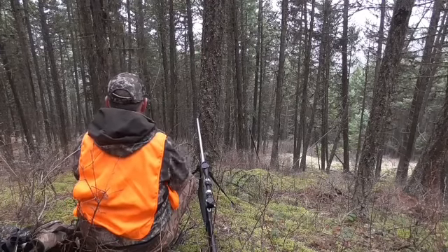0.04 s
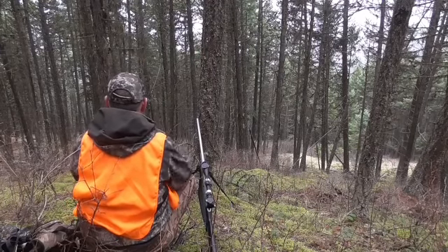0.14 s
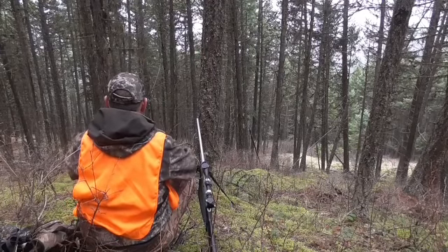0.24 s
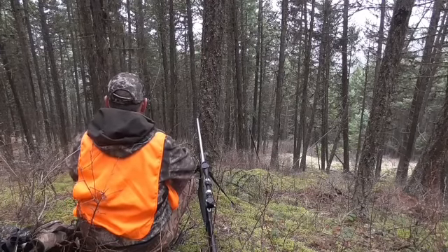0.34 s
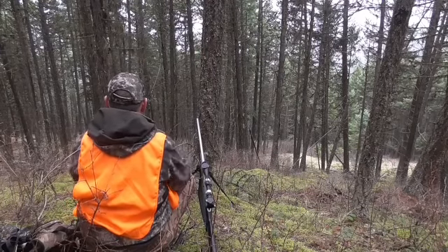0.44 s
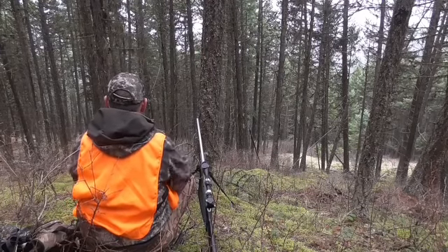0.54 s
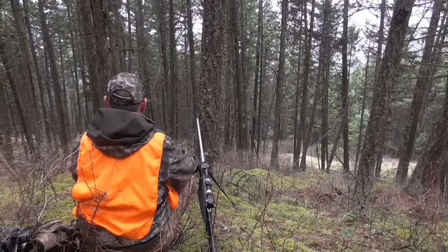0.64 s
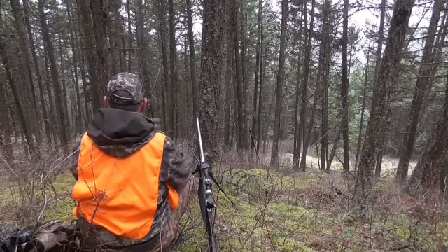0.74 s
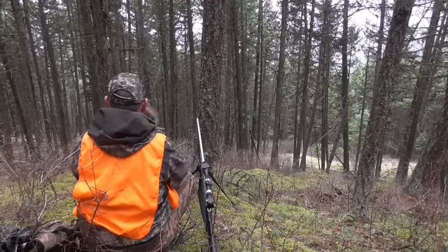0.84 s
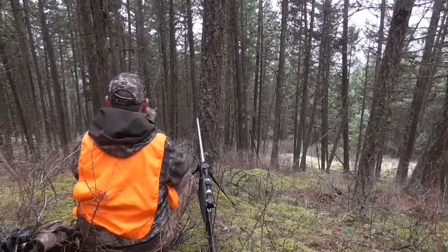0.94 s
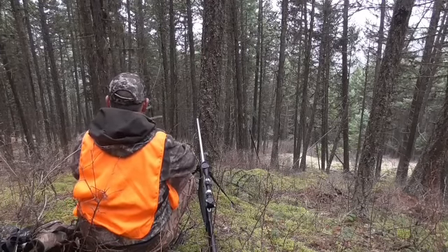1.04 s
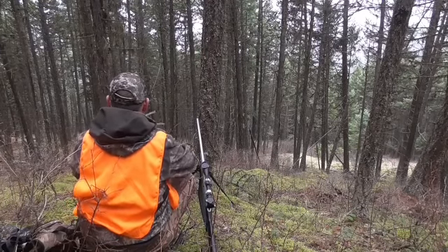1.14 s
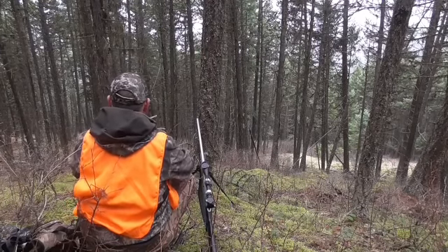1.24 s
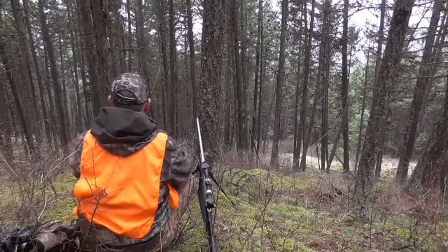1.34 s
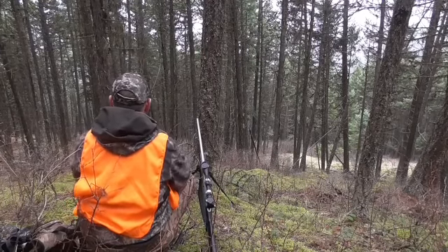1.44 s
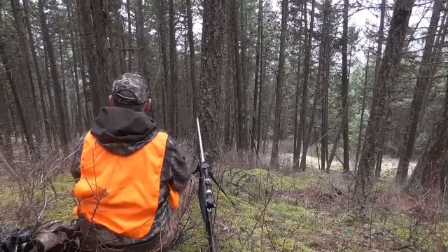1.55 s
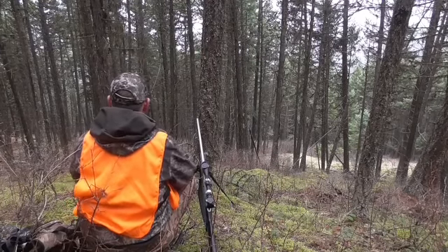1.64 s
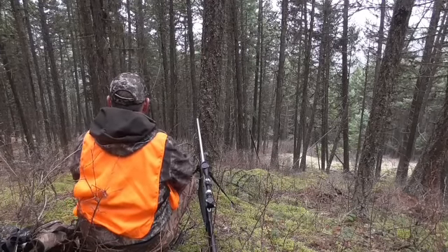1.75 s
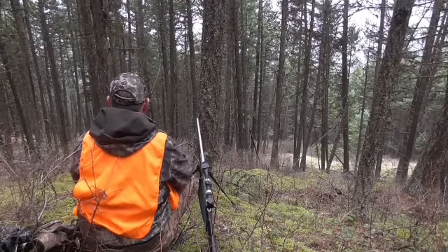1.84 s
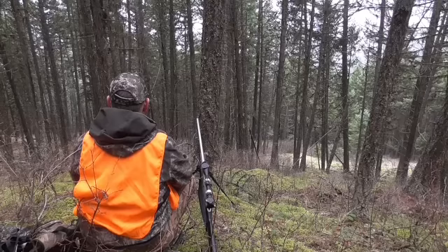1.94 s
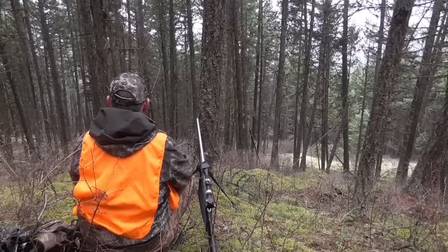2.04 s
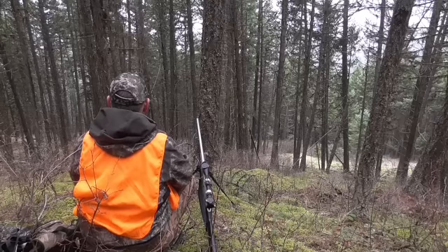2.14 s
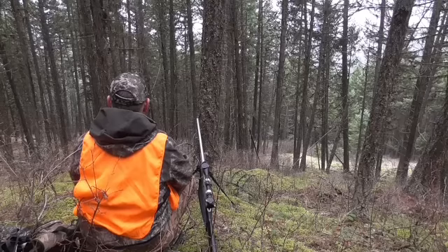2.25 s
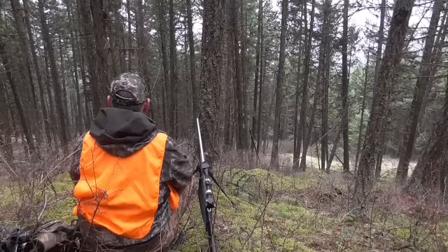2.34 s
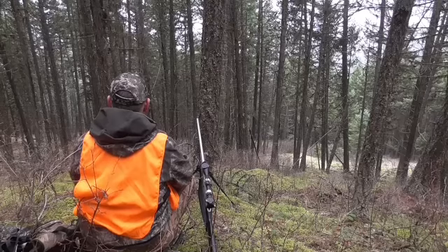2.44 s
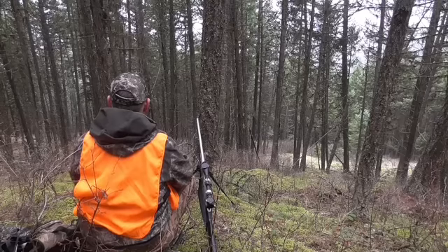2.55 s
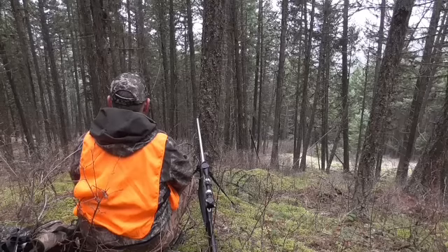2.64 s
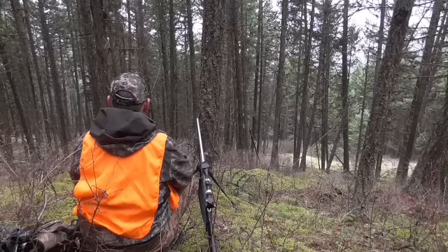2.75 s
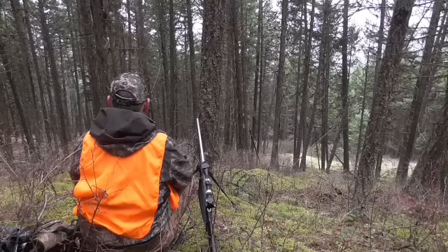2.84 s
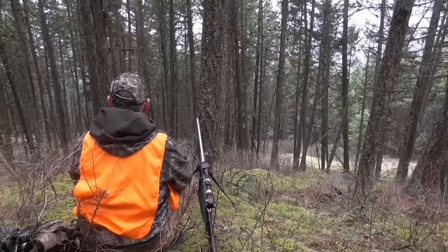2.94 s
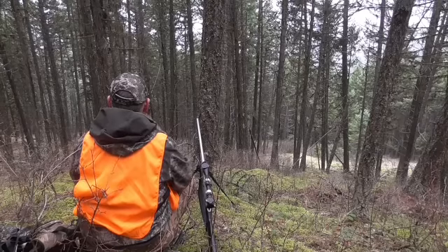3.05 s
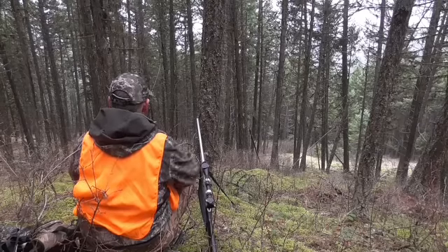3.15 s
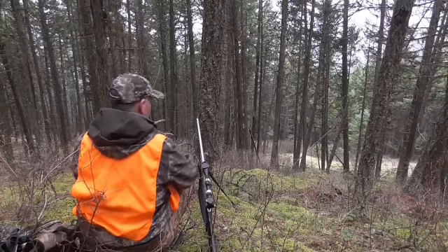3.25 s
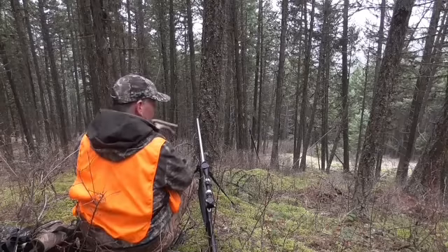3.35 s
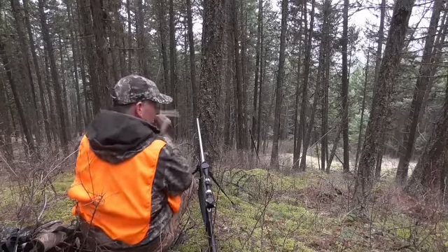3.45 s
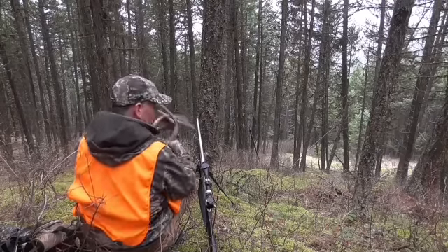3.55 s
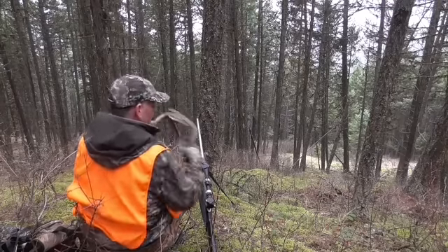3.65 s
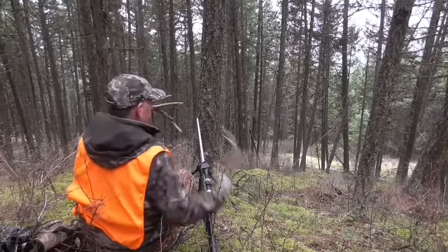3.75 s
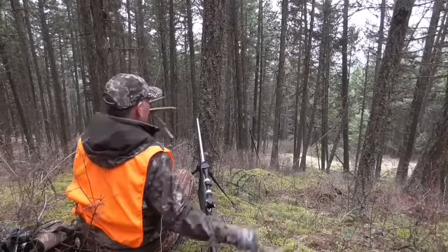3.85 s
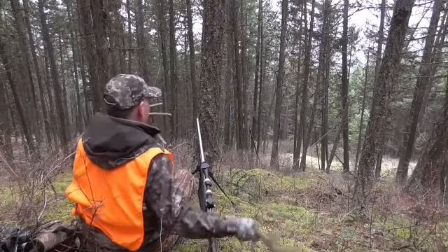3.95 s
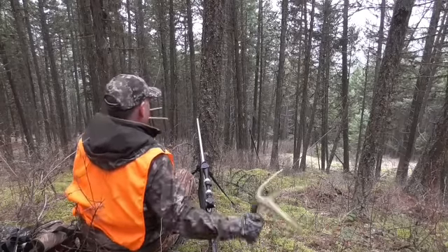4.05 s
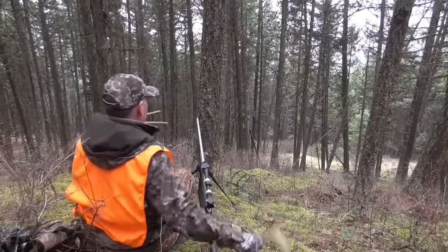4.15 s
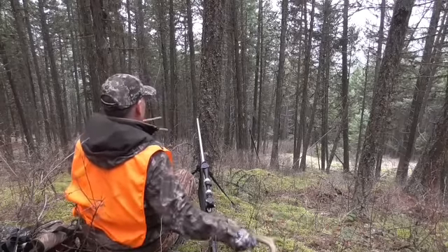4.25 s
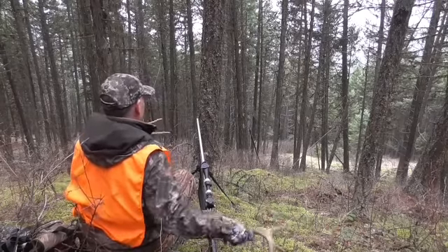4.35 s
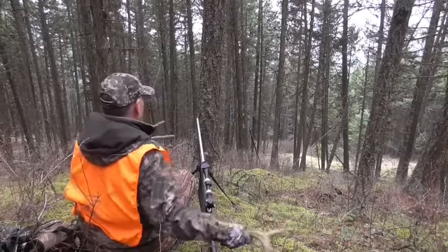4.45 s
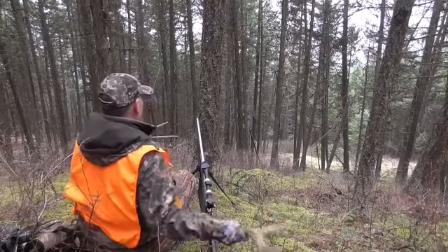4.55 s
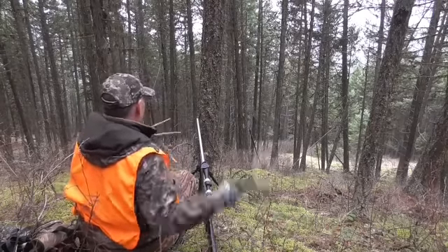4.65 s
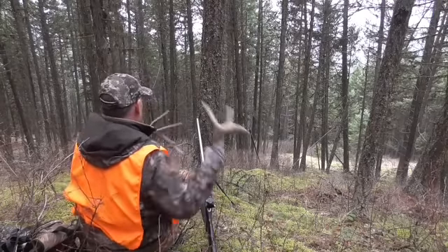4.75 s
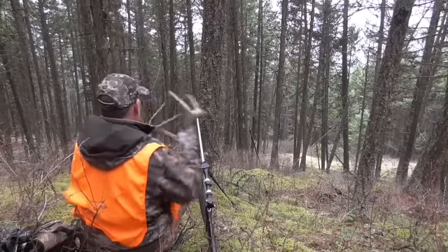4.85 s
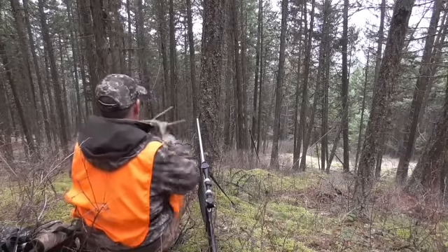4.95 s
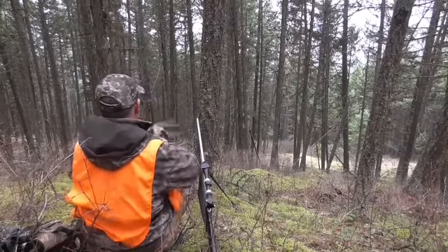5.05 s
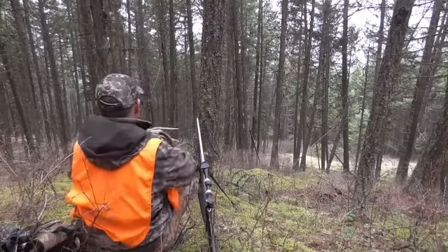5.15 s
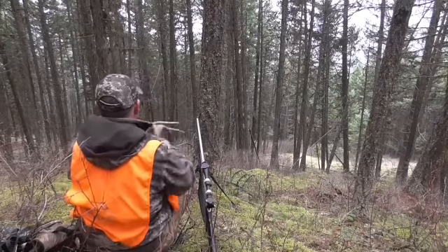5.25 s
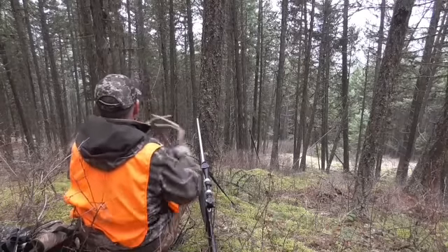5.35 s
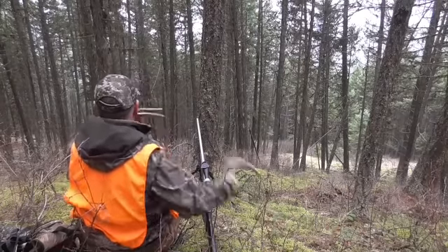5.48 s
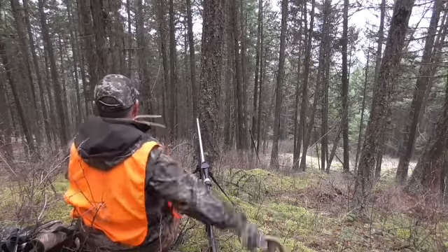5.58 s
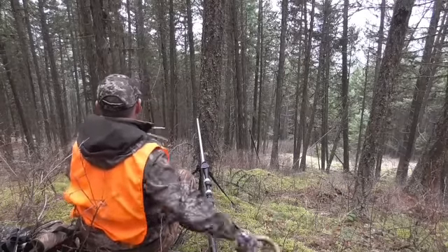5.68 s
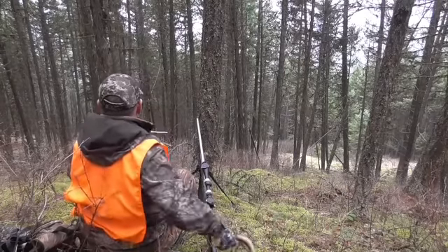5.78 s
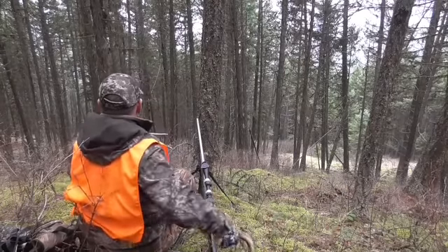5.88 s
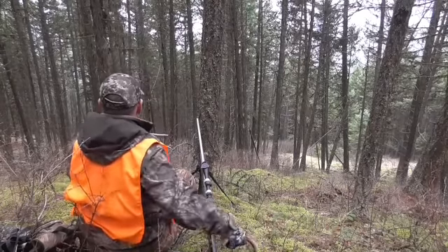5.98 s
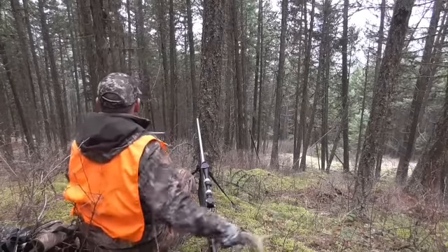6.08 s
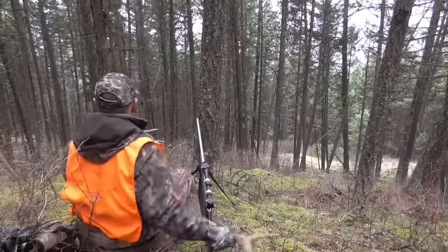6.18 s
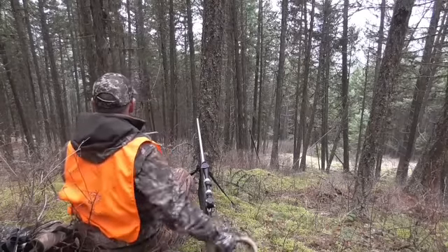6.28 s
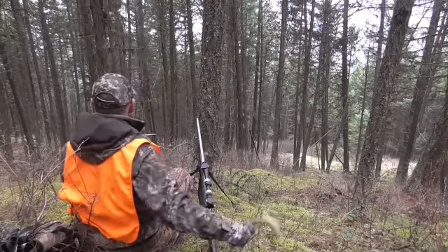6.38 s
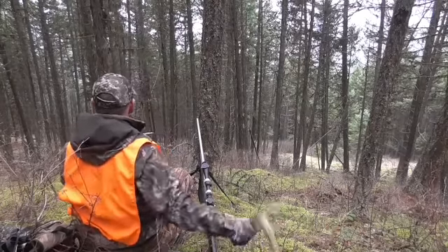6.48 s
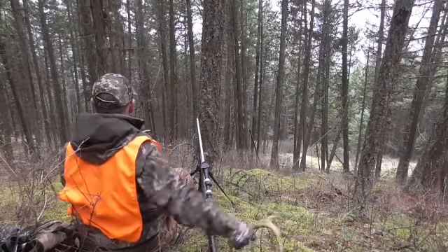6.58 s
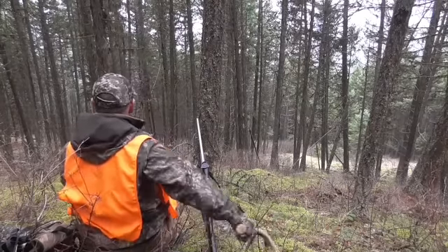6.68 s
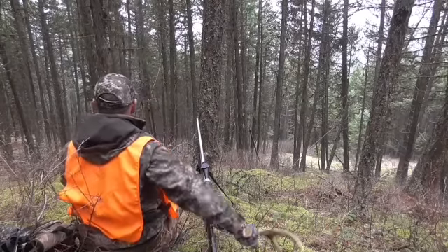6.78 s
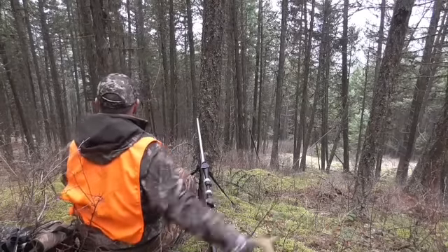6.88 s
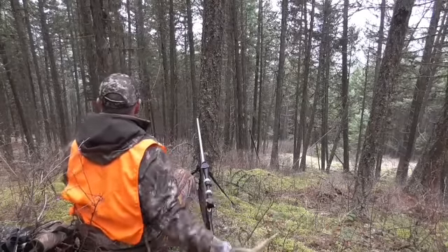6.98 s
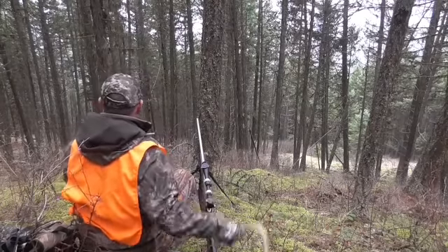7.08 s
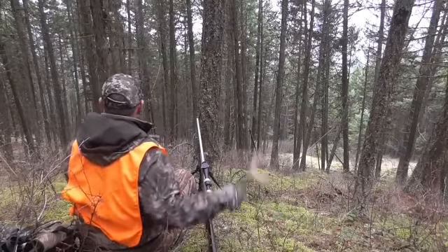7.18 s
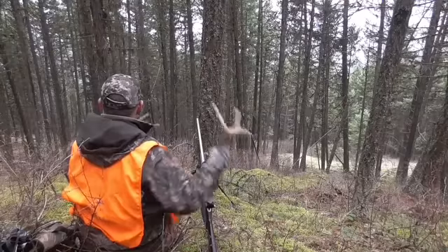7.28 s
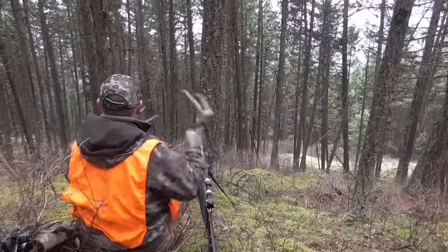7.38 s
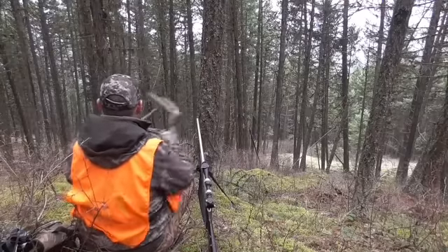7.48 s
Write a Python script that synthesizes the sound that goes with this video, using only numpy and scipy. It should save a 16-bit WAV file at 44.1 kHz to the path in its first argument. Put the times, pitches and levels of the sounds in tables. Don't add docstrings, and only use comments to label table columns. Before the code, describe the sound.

Two antlers clash and grind in three bursts of hard bony clicks in a quiet forest, with ground thumps and raking litter between.

```python
import sys
import numpy as np
from scipy import signal
from scipy.io import wavfile
from scipy.ndimage import uniform_filter1d

SR = 44100
rng = np.random.default_rng(int(sys.argv[2]) if len(sys.argv) > 2 else 0)


def put_to_file(sound):
    columns = np.atleast_2d(sound).T
    safe = np.clip(columns, -1, 1)
    whole_steps = np.round(safe * 32767)
    wavfile.write(sys.argv[1], SR, whole_steps.astype(np.int16))


def voltage_ratio(level):
    return 10 ** (np.asarray(level, float) / 20)


N = 331616

# t/s, tine level/dB, beam level/dB, crack
# level/dB, beam ring f/Hz
FIRST_RUN = [(0.0, -36.5, -27, -40.5, 600), (0.0914, -29, -21, -18, 877), (0.1041, -37.5, -28, -37.5, 665),
             (0.255, -26.5, -27, -11, 1160), (0.2736, -30.5, -26, -27.5, 880),
             (0.3294, -21, -33.5, -8.5, 560), (0.3578, -49.5, -40.5, -36, 566),
             (0.3851, -37, -33.5, -34, 577), (0.511, -24, -21.5, -14.5, 485),
             (0.5405, -21, -27, -14.5, 1414), (0.5624, -28, -54.5, -26, 1240),
             (0.599, -32, -29.5, -33.5, 1060), (0.6744, -32.5, -27, -40, 1460),
             (0.682, -27.5, -29.5, -27, 460), (0.702, -30.5, -32.5, -24, 584), (0.718, -34, -41, -18, 1440),
             (0.753, -34, -52, -29.5, 1300),
             (0.877, -27.5, -18.5, -23.5, 1274), (0.9277, -32.5, -35, -34, 1260),
                (1.0141, -28, -55, -22, 1250), (1.0415, -32, -33.5, -38, 1410),
                (1.0503, -32, -54, -41, 1250), (1.0742, -45, -25.5, -38, 630),
                (1.087, -16.5, -16, -16.5, 1383), (1.247, -43, -33, -66.5, 485),
                (1.4043, -20.5, -18, -15, 592), (1.4197, -23, -21.5, -27, 550),
                (1.5866, -27.5, -26, -18.5, 700), (1.6082, -38, -23, -37, 840),
                (1.7192, -37, -29, -34, 916), (1.731, -27.5, -28, -17.5, 614),
                (1.755, -36, -34.5, -29.5, 544), (1.8015, -26, -44, -14.5, 940),
                (1.568, -47, -35.5, -60, 806), (1.844, -42, -34.5, -58, 574), (1.919, -54, -39, -62, 530),
                (1.938, -61, -35, -67, 876)]
SECOND_RUN = [(3.0899, -33, -30.5, -17.5, 570), (3.1081, -32.5, -46, -39, 977),
              (3.1143, -38, -30.5, -36, 1170), (3.1746, -23.5, -41, -24, 697),
              (3.1877, -20.5, -37.5, -15, 1160), (3.201, -43, -46, -27, 1280), (3.2182, -50, -30, -36, 982),
              (3.233, -20.5, -22, -10.5, 681), (3.2614, -39, -36.5, -35, 557),
              (3.3611, -25, -21.5, -19, 1310), (3.3756, -26.5, -35, -30, 1180),
              (3.3984, -27, -21, -23.5, 521), (3.5141, -21, -44, -13.5, 1290),
              (3.574, -25.5, -37, -24, 1310), (3.5894, -19.5, -24.5, -12, 1480),
              (3.6067, -47, -21.5, -45, 1290), (3.6176, -27.5, -24, -26, 930),
              (3.6309, -27.5, -55, -30, 1270), (3.6426, -49, -29, -63, 1360),
              (3.6609, -59, -32.5, -55, 450)]
THIRD_RUN = [(4.997, -29, -40, -17, 935), (5.0132, -30.5, -81, -56, 1270),
             (5.0217, -15.5, -15.5, -12.5, 950), (5.092, -31.5, -25, -31, 866),
             (5.1518, -20, -17.5, -16.5, 625), (5.166, -19, -24.5, -20.5, 660),
             (5.3398, -35, -46, -48, 1520), (5.3491, -27.5, -27.5, -13.5, 520),
             (5.3726, -34, -25, -22.5, 810), (5.3818, -41, -27, -34, 720), (5.4391, -25, -30, -20, 890),
             (5.448, -30, -26, -11, 1540)]
REBOUNDS = [(0.289, -44, -34, -30, 900), (0.345, -46, -36, -31.5, 610), (0.3685, -50, -48, -34.5, 800),
            (0.6072, -40, -29.5, -39, 1020), (0.890, -40, -26.5, -41.5, 1260), (0.900, -41, -42, -46, 557),
            (0.912, -48, -40, -50, 1210), (1.099, -38, -25, -36, 870), (1.4655, -42, -39, -48, 700),
            (1.591, -34.5, -28.5, -36, 1290), (3.2448, -29.5, -23, -24, 890), (3.540, -48, -30, -50, 950),
            (5.0265, -36, -37, -33, 890), (5.0315, -28, -36, -29, 1290), (5.041, -35, -32, -46, 700),
            (5.396, -41, -37, -41, 800)]
# t/s, f/Hz
TINE_TOUCH = [(0.003, 2900), (0.092, 3840), (0.258, 3240), (0.276, 2350), (0.332, 4600), (0.387, 2440),
              (0.513, 3330), (0.547, 3800), (0.563, 3600), (0.601, 2070), (0.678, 1740), (0.689, 4730),
              (0.702, 4360), (0.719, 3570), (0.757, 1860), (0.879, 3280), (0.928, 1740), (1.016, 1960),
              (1.043, 1830), (1.09, 2190), (1.408, 4560), (1.422, 1730), (1.587, 3400), (1.731, 4100),
              (1.757, 2940), (1.807, 3250), (3.092, 4130), (3.118, 1780), (3.176, 3450), (3.188, 4260),
              (3.219, 2110), (3.236, 3800), (3.262, 2110), (3.364, 3200), (3.378, 3770), (3.399, 2450),
              (3.517, 4570), (3.578, 2320), (3.593, 3250), (3.609, 2000), (3.619, 5030), (3.632, 2290),
              (3.645, 1780), (4.999, 3600), (5.024, 1840), (5.034, 1860), (5.093, 2340), (5.153, 2220),
              (5.167, 1940), (5.189, 2270), (5.342, 2690), (5.351, 3650), (5.373, 3800), (5.384, 5030),
              (5.4405, 3940), (5.4485, 4970)]
# f/Hz, level/dB, t60/s
BEAM_MODES = [(210, -13, 0.045), (555, -18, 0.06), (647, -13, 0.05), (950, -14, 0.031), (1010, -18, 0.023),
              (1300, -13.5, 0.045)]
# f/Hz, level/dB, t60/s
TINE_MODES = [(1830, -35, 0.0065), (2220, -16.5, 0.022), (2425, -16, 0.005), (3450, -15, 0.012),
              (3670, -14, 0.012), (4600, -32.5, 0.0089)]
# f/Hz, level/dB
BONE_CRACK = [(3500, -16.5), (4800, 3), (6000, -1), (7800, 3), (10000, -4.5), (13000, -12.5),
              (15000, -28.5), (16800, -42)]
# start t/s, length/s, level/dB
RUBS = [(0.07, 0.041, -43), (0.235, 0.099, -47.5), (0.34, 0.064, -51), (0.632, 0.14, -47.5),
        (1.036, 0.033, -50), (1.383, 0.069, -40.5), (1.706, 0.067, -46.5), (1.787, 0.053, -43.5),
        (1.909, 0.037, -55.5), (3.086, 0.049, -47), (3.126, 0.14, -44.5), (3.349, 0.083, -48),
        (3.543, 0.14, -49), (5.026, 0.014, -32), (5.663, 0.022, -41), (5.136, 0.052, -38)]
# f/Hz, level/dB
GRIND = [(250, -28), (500, 2.5), (1300, 3), (3000, 0), (6000, -7.5), (12000, -21), (16000, -56)]
# t/s, level/dB
PUSHES = [
    (0.51, -45.5),
    (3.513, -34.5),
    (3.591, -35.5),
    (5.022, -27),
]
# t/s, tine level/dB, beam level/dB, crack level/dB
BEATING = [(3.8927, -49, -54, -27), (3.902, -85.5, -45, -27), (3.946, -26.5, -9, -5),
           (4.015, -36, -27, -18), (4.2578, -24, -30, -17.5), (4.2694, -27.5, -18.5, -15),
           (4.331, -56, -42, -36.5), (4.4519, -40.5, -31.5, -33), (4.584, -73, -45.5, -80),
           (4.6626, -38, -37, -42), (4.6704, -51, -36, -33.5), (3.965, -55, -31, -50),
           (3.995, -51, -35.5, -55)]
SWEEPING = [(5.677, -20, -16.5, -18.5), (5.6979, -34.5, -29, -29), (5.771, -53, -61, -33),
            (5.8117, -42, -21.5, -30), (5.8418, -47, -34, -28.5), (5.865, -37, -39, -26.5),
            (5.942, -55, -61, -35), (6.0164, -55, -86, -33.5), (6.116, -29, -39, -11.5),
            (6.205, -38.5, -53, -38), (6.2735, -44, -45, -30), (6.325, -40.5, -26.5, -25),
            (6.376, -66, -41, -40), (6.4271, -55, -32.5, -28), (6.4661, -37, -30, -20),
            (6.5282, -56, -50, -28.5), (6.6079, -26.5, -14, -12), (6.7326, -48, -35, -24),
            (6.751, -38, -30, -23), (6.777, -39, -36.5, -28.5), (6.8179, -35.5, -56, -20),
            (6.849, -53, -43, -25), (6.9083, -35.5, -27, -26), (6.9443, -26.5, -54, -13.5),
            (6.9593, -40, -50, -22), (7.0071, -30, -25.5, -23), (7.1887, -37, -24.5, -11.5),
            (7.222, -39, -40, -15.5), (7.2309, -39.5, -86, -14), (7.2725, -56, -112, -28.5)]
# t/s, crack level/dB, knock level/dB
TICKS = [(5.6096, -30, -60), (5.666, -32, -30.5), (5.685, -29, -28), (5.8273, -32, -31), (5.8712, -38, -43),
         (6.094, -38, -53), (6.1107, -26, -33), (6.168, -35, -43), (6.216, -30, -55), (6.232, -32, -60),
         (6.249, -48, -64), (6.3358, -36, -33), (6.5003, -28, -65), (6.5377, -34, -48), (6.7158, -32, -55),
         (6.803, -45, -63), (6.827, -29, -30), (6.933, -19, -34), (6.968, -20.5, -41), (6.9744, -29, -48),
         (7.1537, -38, -56), (7.1746, -28, -32.5), (7.2032, -29, -31), (3.881, -36, -55),
         (3.9073, -32, -55), (3.915, -25, -50), (3.9274, -39, -46), (5.626, -32, -51), (5.852, -29, -47),
         (5.886, -42, -43), (6.31, -45, -37), (6.379, -48, -45), (6.4378, -45, -38), (6.4747, -32, -40),
         (6.843, -42, -34.5), (6.915, -30, -41), (6.927, -30, -45), (6.9367, -36, -35), (7.178, -43, -31),
         (7.229, -36, -42), (7.411, -37.5, -60), (7.435, -44.5, -73)]
# t/s, f/Hz
GROUND_TOUCH = [(3.948, 426), (3.978, 597), (3.998, 450), (4.017, 436), (4.036, 433), (4.05, 430),
                (4.07, 440), (4.273, 427), (4.454, 1450), (4.673, 580), (5.669, 1500), (5.679, 1134),
                (5.703, 450), (5.812, 500), (5.831, 594), (5.846, 503), (6.12, 895), (6.334, 466),
                (6.43, 700), (6.442, 430), (6.469, 1150), (6.611, 696), (6.735, 1500), (6.752, 1250),
                (6.78, 915), (6.82, 1370), (6.829, 1350), (6.844, 1250), (6.91, 900), (6.946, 1290),
                (7.009, 430), (7.043, 450), (7.178, 544), (7.19, 1510), (7.21, 1320), (7.225, 1320)]
# f/Hz, level/dB
TWIG_CRACK = [(3500, -16), (5000, -4.5), (6500, 10.5), (8200, 14.5), (10000, 9.5), (13000, 9.5),
              (16000, -13), (16800, -30)]
# t/s, level/dB, f/Hz, overtone level/dB
THUDS = [(3.947, -8, 194, 9), (4.018, -29.5, 169, -1), (4.272, -12.5, 177, 9.5), (4.33, -35, 153, -3),
         (4.456, -32, 170, -4.5), (4.667, -39, 170, 11), (5.676, -28.5, 207, -5), (5.707, -29, 159, -12.5),
         (5.81, -29, 220, 6), (5.832, -33, 148, -1), (5.871, -36, 146, -2), (6.015, -35, 154, -3.5),
         (6.117, -33.5, 189, -1), (6.151, -34.5, 156, 0), (6.215, -39, 189, 13), (6.282, -37, 219, 9),
         (6.331, -27, 170.6, 2.5), (6.438, -40, 217, -9), (6.463, -46, 217, -7), (6.61, -22, 139, 4),
         (6.749, -34.5, 130, -8), (6.844, -47, 216, 2), (6.914, -32.5, 165, -10), (7.013, -26, 206, -3.5),
         (7.041, -31.5, 192, 3.5), (7.16, -32, 146, 4), (7.19, -27, 157, -16)]
# t/s, dry crackle level/dB, soil scuff level/dB
RAKING = [
    [(3.7, -62, -64), (4.204, -62.5, -60), (4.482, -65, -65), (4.95, -66, -65.5)],
    [(5.5, -75, -104), (5.79, -57, -57), (5.93, -59.5, -62), (6.83, -60.5, -60), (7.3, -66, -71),
     (7.52, -65, -64)],
]
# start t/s, length/s, crackle level/dB, scuff level/dB
STROKES = [(3.864, 0.069, -47, -61.5), (4.632, 0.049, -51, -47.5), (5.375, 0.057, -52.5, -56),
           (5.592, 0.076, -48, -52), (5.764, 0.19, -55.5, -59.5), (6.204, 0.16, -61, -60),
           (6.377, 0.14, -51.5, -59), (6.667, 0.075, -57, -59), (6.811, 0.029, -45, -49),
           (6.897, 0.1345, -46.5, -50.5), (7.142, 0.073, -64, -41.5), (7.197, 0.04, -41.5, -47),
           (7.085, 0.041, -63, -61)]
# f/Hz, level/dB
CRACKLE = [(1200, -28.5), (2000, -7), (4500, -9.5), (6500, -6.5), (8000, 0.5), (12500, -6), (15600, -20.5),
           (16300, -53)]
# f/Hz, level/dB
SCUFF = [(25, -34), (60, -5.5), (150, -9), (450, -11), (1300, -12.5), (2200, -34)]
# f/Hz, t60/s
TRUNKS_T60 = [(150, 0.13), (500, 0.72), (2000, 0.8), (5000, 0.58), (12000, 0.59)]
# f/Hz, gain/dB
TRUNKS_GAIN = [(100, -45), (280, -22), (450, -11), (700, -10.5), (1500, -12.5), (5000, -11.5),
               (14000, -19.5)]
# f/Hz, density/dB per Hz
HUSH = [(18, -48.5), (30, -13.5), (125, 4), (276, -2.5), (979, -4), (2220, -17.5), (2530, -22.5),
        (4180, -20.5), (6210, -28), (8090, -16.5), (14100, -20), (15200, -24), (16100, -52)]
# f/Hz, level/dB
LEFT_MINUS_RIGHT = [(100, -3.5), (700, -0.5), (2000, 1.35), (6000, -0.5), (15000, -1.5)]
# f/Hz, gain/dB
SIDE_LIFT = [(300, -3), (700, -3), (2500, -4.5), (5000, -1.5), (8000, -1.5), (13000, 1)]

FIRST_TOUCH, CONTACT_RISE_S = 0.33, 0.0014
GRIND_DB, GRIND_S = -7, 0.007
BONE_LOW_HZ, MIC_LOW_HZ, MIC_EDGE_HZ = 365, 102, 16700
RUB_T60 = 0.006
STROKE_RISE, STROKE_FALL_S = 0.51, 0.0039
THUD_T60, SETTLE_T60, SOIL_RISE_S = 0.034, 0.1, 0.00095
LUMP_RATIO = 14
PUSH_S = 0.00066
SWAY_HZ = 90
HUSH_DB = -64.5
SOFT_LIMIT = 0.9


def read(points, hz):
    f, value = np.transpose(points)
    return np.interp(np.log(hz + 1), np.log(f + 1), value)


def evened(x):
    return x / np.sqrt(np.mean(x ** 2) + 1e-20)


def coloured(x, points):
    log_gain = np.log(voltage_ratio(read(points, abs(np.fft.fftfreq(2048, 1 / SR)))))
    spectrum = np.exp(log_gain - 1j * signal.hilbert(log_gain).imag)
    taps = np.fft.ifft(spectrum).real[:1024]
    taps = taps.reshape((1,) * (x.ndim - 1) + (-1,))
    return signal.oaconvolve(x, taps, axes=-1)[..., :x.shape[-1]]


def low_cut(x, hz):
    return signal.sosfilt(signal.butter(2, hz, "high", fs=SR, output="sos"), x)


def add(mix, s, sounds, peak_db, size):
    top = np.sqrt(uniform_filter1d(sounds ** 2, size, axis=1).max(1))
    levelled = sounds * (voltage_ratio(peak_db) / top)[:, None]
    for start, sound in zip(np.round(s * SR).astype(int), levelled):
        part = mix[start:][:len(sound)]
        part += sound[:len(part)]


def ring(hz, t60, t):
    return np.sin(2 * np.pi * hz[:, None] * t) * voltage_ratio(-60 * t / t60)


def swell(start, length):
    t = np.arange(N) / SR - start
    gather = np.clip(t / (STROKE_RISE * length), 0, 1)
    return gather * np.exp(-np.maximum(t - length, 0) / STROKE_FALL_S)


def nearest(touches, s):
    at, hz = np.transpose(touches)
    k = abs(at - s[:, None] - 0.002).argmin(1)
    lag = at[k] - s
    return np.where((lag > 0) & (lag < 0.007), lag, 0.0015), hz[k]


def chatter(count, t, fall_s, density, first=1.2):
    shape = (count, t.shape[-1])
    touches = rng.standard_normal(shape) * (rng.random(shape) < density)
    touches = touches * np.exp(-t / fall_s)
    hardest = ((t * np.ones(shape)) > 0).argmax(1)
    touches[np.arange(count), hardest] = first
    return touches


def struck(modes, lead_hz, lead_t60, drive, t, damp, spread_db=5.5):
    body = ring(lead_hz, lead_t60, t)
    for hz, db, t60 in modes:
        detune, weight = rng.standard_normal((len(drive), 2)).T
        gain = voltage_ratio(db + spread_db * np.clip(weight, -2, 1))[:, None]
        body = body + gain * ring(hz * (1 + 0.041 * detune), damp * t60, t)
    return signal.fftconvolve(body, drive, axes=1)[:, :len(t)]


def crack(rise, since, t, crack_s):
    after = np.maximum(since, 0)
    catches = voltage_ratio(39.0 * uniform_filter1d(rng.standard_normal(rise.shape), size=50, axis=1))
    fall = np.exp(-after / crack_s) + 0.45 * np.exp(-after / (4.2 * crack_s))
    onset = 1 - np.exp(-t / 0.00054)
    burst = rng.standard_normal(rise.shape) * catches * rise * onset * fall
    burst[np.arange(len(rise)), (since > 0).argmax(1)] = 9
    return burst


def blows(s, tine_db, beam_db, crack_db, beam_hz, tine_hz, lag, crack_colour,
          fall_s, ring_s, crack_s, damp, beam_lift_db):
    t, mix = np.arange(2600) / SR, np.zeros(N)
    since = t - 0.79 * lag[:, None]
    after = np.maximum(since, 0)
    rise = FIRST_TOUCH + (1 - FIRST_TOUCH) * np.exp(np.minimum(since, 0) / CONTACT_RISE_S)
    drive = rise * chatter(len(s), after, fall_s, density=0.081)
    beam = struck(BEAM_MODES, beam_hz, ring_s, drive, t, damp)
    add(mix, s, beam, beam_db + beam_lift_db, size=130)
    tines = struck(TINE_MODES, tine_hz, ring_s / 5, drive, t, damp)
    add(mix, s, tines, tine_db - 4.0, size=60)
    burst = crack(rise, since, t, crack_s)
    add(mix, s, coloured(burst, crack_colour), crack_db - 7.0, size=40)
    slide = coloured(rise * chatter(len(s), after, GRIND_S, density=0.15), GRIND)
    add(mix, s, slide, tine_db + GRIND_DB, size=130)
    return low_cut(mix, BONE_LOW_HZ)


def clashes():
    rows = np.transpose(FIRST_RUN + SECOND_RUN + THIRD_RUN + REBOUNDS)
    lag, tine_hz = nearest(TINE_TOUCH, rows[0])
    return blows(*rows, tine_hz, lag, BONE_CRACK, fall_s=0.0024, ring_s=0.03, crack_s=0.0013,
                 damp=0.87, beam_lift_db=-6.5)


def grinding():
    slips = rng.standard_normal(N) * (rng.random(N) < 3500 / SR)
    slips = slips * voltage_ratio(0.97 * np.minimum(rng.exponential(1, N), 4))
    t = np.arange(600) / SR
    hz, db, _ = np.transpose(BEAM_MODES + TINE_MODES)
    body = (voltage_ratio(db)[:, None] * ring(hz, RUB_T60, t)).sum(0)
    ringing = evened(signal.oaconvolve(slips, body)[:N])
    scrape = evened(coloured(slips, GRIND))
    grain = low_cut(evened(ringing + voltage_ratio(-20.5) * scrape), BONE_LOW_HZ)
    return grain * sum(voltage_ratio(db) * swell(start, length) for start, length, db in RUBS)


def pushes():
    s, db = np.transpose(PUSHES)
    u, mix = np.arange(2000) / SR / PUSH_S, np.zeros(N)
    shove = (1 - 0.5 * u) * u * np.exp(-u)
    add(mix, s, np.tile(shove, (len(s), 1)), db, size=220)
    return mix


def snaps():
    ticks = [(s, knock_db - 14.5, knock_db, crack_db) for s, crack_db, knock_db in TICKS]
    rows = np.transpose(BEATING + SWEEPING + ticks)
    lag, beam_hz = nearest(GROUND_TOUCH, rows[0])
    tine_hz = rng.uniform(1420, 3830, len(lag))
    return blows(*rows, beam_hz, tine_hz, lag, TWIG_CRACK, fall_s=0.0029, ring_s=0.0099, crack_s=0.00055,
                 damp=0.41, beam_lift_db=-4.5)


def thuds():
    s, db, hz, over_db = np.transpose(THUDS)
    t, mix = np.arange(6000) / SR, np.zeros(N)
    sagging = t + 0.00023 * (1 - np.exp(-t / 0.012))
    fall = voltage_ratio(-60 * (t / THUD_T60) ** 2) + voltage_ratio(-20.0 - 60 * t / SETTLE_T60)
    low = np.sin(2 * np.pi * hz[:, None] * sagging) * fall
    low = low * (1 - np.exp(-t / SOIL_RISE_S)) ** 2
    over = voltage_ratio(over_db - 0.5)[:, None] * ring(1.633 * hz, 0.88 * THUD_T60, t)
    over = over * (1 - np.exp(-t / 0.00044))
    lumps = chatter(len(s), t, fall_s=0.033, density=0.011, first=LUMP_RATIO)
    swing = signal.fftconvolve(low + over, lumps, axes=1)[:, :len(t)]
    add(mix, s, swing, db - 1.5, size=220)
    return mix


def raking():
    t, out = np.arange(N) / SR, np.zeros((2, N))
    clumps = evened(uniform_filter1d(rng.standard_normal(N), size=160))
    grains = rng.standard_normal((3, N))
    grains = grains * voltage_ratio(2.2 * np.minimum(rng.exponential(1, N), 5) + 2.64 * clumps)
    crackle = evened(coloured(grains[0] + 0.55 * grains[1:], CRACKLE))
    soil = rng.standard_normal((3, N))
    soil = soil * voltage_ratio(3.0 * evened(uniform_filter1d(rng.standard_normal(N), size=700)))
    scuff = evened(coloured(soil[0] + 0.12 * soil[1:], SCUFF))
    for rows in RAKING:
        s, crackle_db, scuff_db = np.transpose(rows)
        out += crackle * voltage_ratio(np.interp(t, s, crackle_db, -120, -120))
        out += scuff * voltage_ratio(np.interp(t, s, scuff_db, -120, -120))
    for start, length, crackle_db, scuff_db in STROKES:
        out += swell(start, length) * (voltage_ratio(crackle_db) * crackle + voltage_ratio(scuff_db) * scuff)
    return out


def scatter(length, first):
    taps = np.zeros((2, length))
    at = np.arange(first, length - 16, 16)
    at = at + rng.integers(0, 16, (2, len(at)))
    np.put_along_axis(taps, at, rng.choice([-1., 1.], at.shape), 1)
    return taps


def brush(x, db=-5.0, t60=0.05):
    taps = scatter(4000, first=40) * voltage_ratio(-60 * np.arange(4000) / SR / t60)
    taps /= np.linalg.norm(taps[0])
    return voltage_ratio(db) * signal.oaconvolve(x[None], taps, axes=1)[:, :N]


def trunks(x):
    sway_hz = SWAY_HZ * evened(uniform_filter1d(rng.standard_normal(N), size=90))
    out, turn = 0, 2 * np.pi * np.cumsum(sway_hz + 11) / SR
    for feed in (np.sin(turn), np.cos(turn)):
        hz, t, z = signal.stft(scatter(SR, first=500), SR, nperseg=256)
        t60 = read(TRUNKS_T60, hz)[:, None]
        energy = t60 * SR / 16 / (2 * np.log(1000))
        z = z * voltage_ratio(read(TRUNKS_GAIN, hz)[:, None] - 60 * t / t60) / np.sqrt(energy)
        echoes = signal.istft(z, SR, nperseg=256)[1]
        out = out + signal.fftconvolve((feed * x)[None], echoes, axes=1)[:, :N]
    return out


def hush():
    return voltage_ratio(HUSH_DB + 3.0) * evened(coloured(rng.standard_normal((2, N)), HUSH))


def scene():
    bone, ground, soil = clashes() + grinding(), snaps(), thuds()
    left = voltage_ratio(-0.75) * (ground + 0.5 * np.roll(ground, 1)) / 1.4
    aside = np.array([left, voltage_ratio(1.26) * ground])
    near = bone + aside + soil + brush(bone) + brush(ground, db=-8.5, t60=0.027)
    near = low_cut(near, MIC_LOW_HZ)
    far = trunks(bone + voltage_ratio(-6.5) * ground + voltage_ratio(5.0) * soil)
    return near + far + raking() + hush() + pushes()


def roll_off(x):
    return signal.sosfilt(signal.butter(12, 16850, fs=SR, output="sos"), x)


def record(dry):
    mid, side = dry.mean(0), coloured((dry[0] - dry[1]) / 2, SIDE_LIFT)
    lean = np.array(LEFT_MINUS_RIGHT)
    left = coloured(mid + side, lean * [1, 0.5])
    right = coloured(mid - side, lean * [1, -0.5])
    pair = SOFT_LIMIT * np.tanh(np.array([left, right]) / SOFT_LIMIT)
    pair = signal.oaconvolve(pair, signal.firwin(255, MIC_EDGE_HZ, fs=SR)[None], "same")
    return roll_off(pair)


dry = scene()
out = record(dry)
put_to_file(out)
```